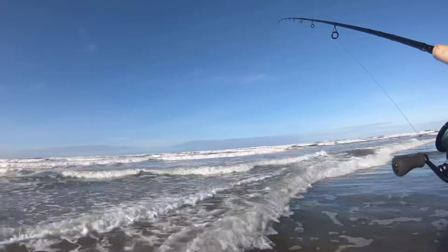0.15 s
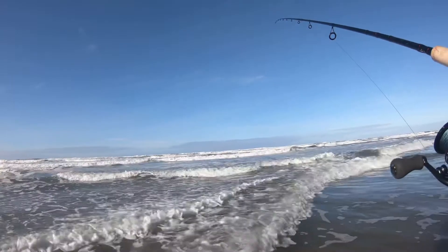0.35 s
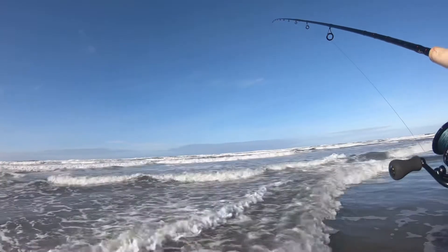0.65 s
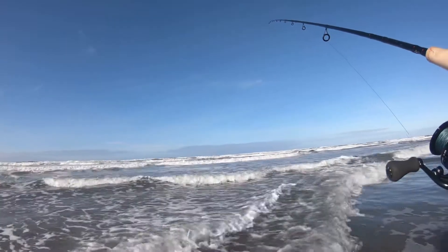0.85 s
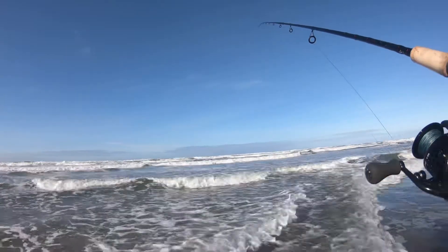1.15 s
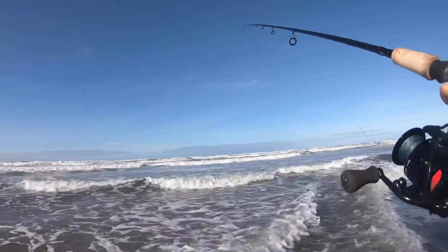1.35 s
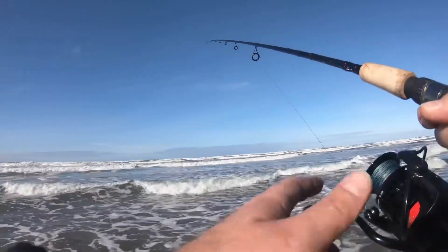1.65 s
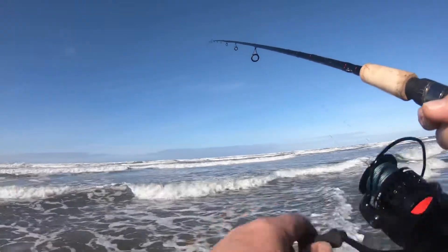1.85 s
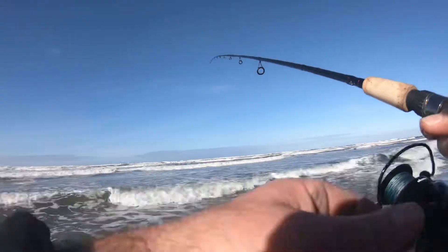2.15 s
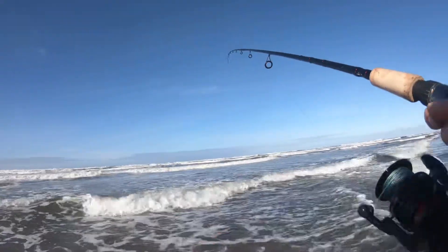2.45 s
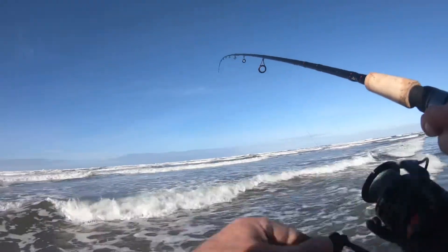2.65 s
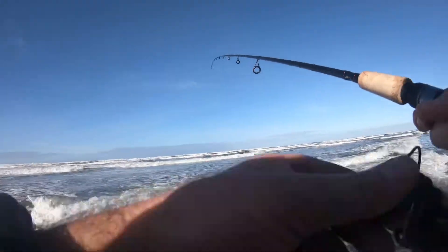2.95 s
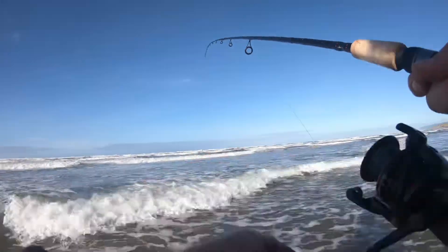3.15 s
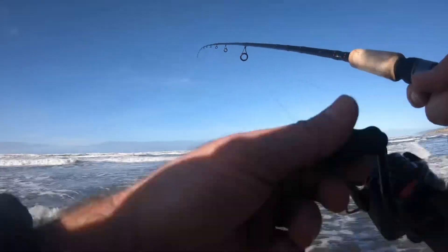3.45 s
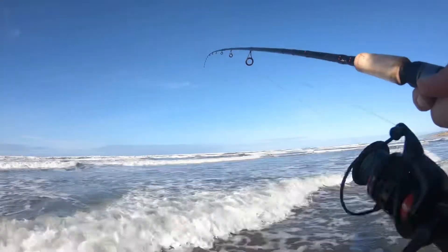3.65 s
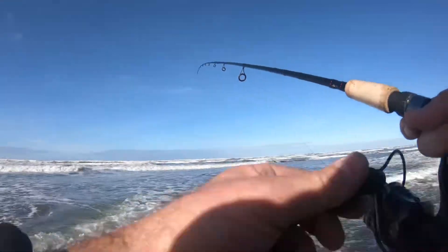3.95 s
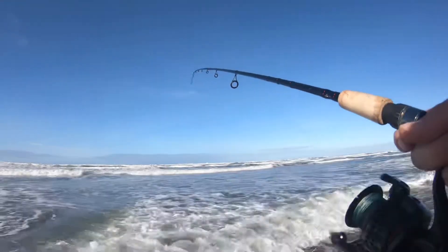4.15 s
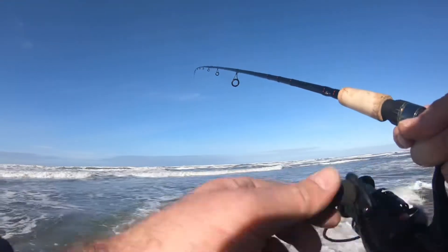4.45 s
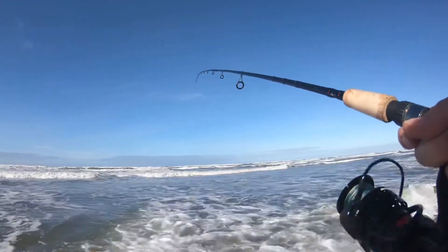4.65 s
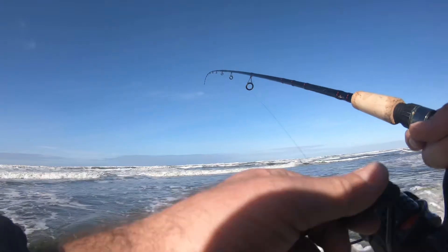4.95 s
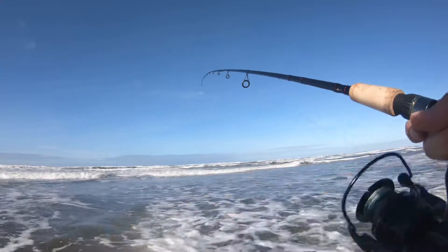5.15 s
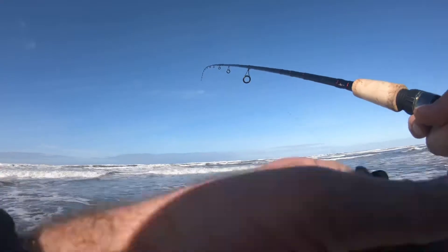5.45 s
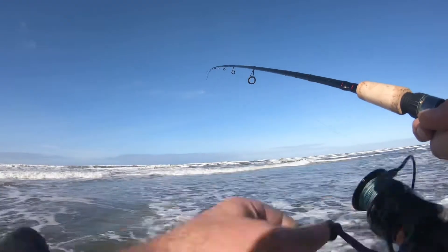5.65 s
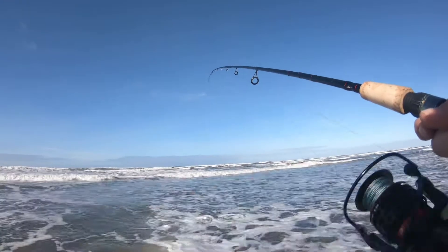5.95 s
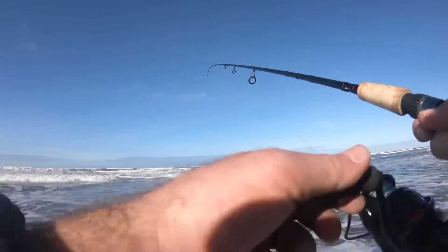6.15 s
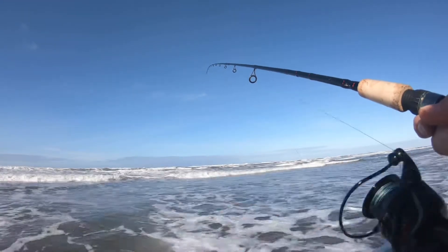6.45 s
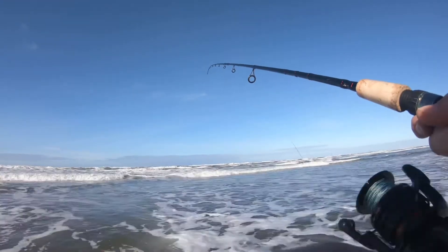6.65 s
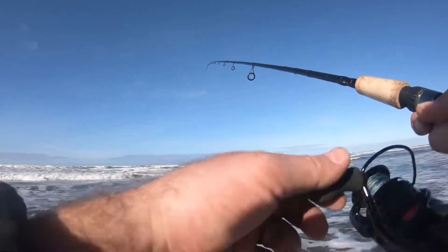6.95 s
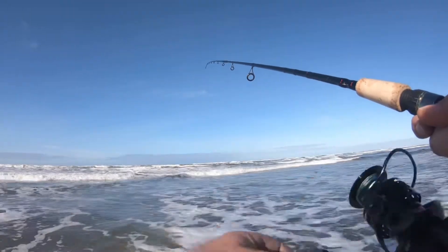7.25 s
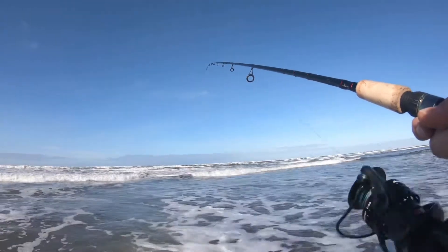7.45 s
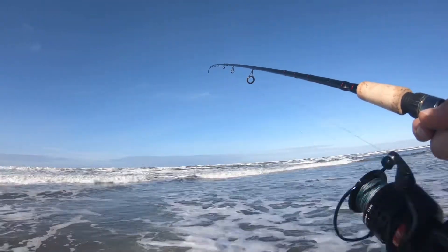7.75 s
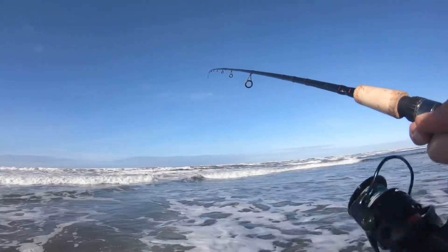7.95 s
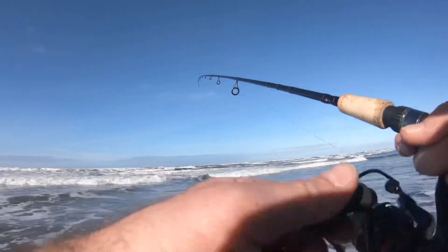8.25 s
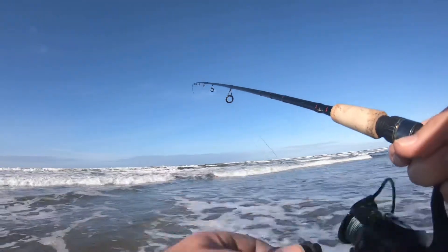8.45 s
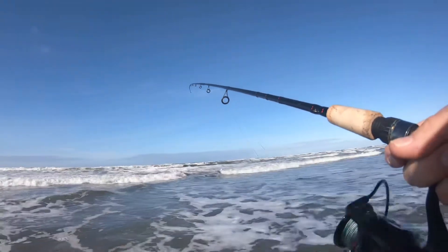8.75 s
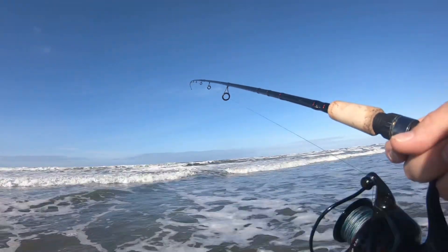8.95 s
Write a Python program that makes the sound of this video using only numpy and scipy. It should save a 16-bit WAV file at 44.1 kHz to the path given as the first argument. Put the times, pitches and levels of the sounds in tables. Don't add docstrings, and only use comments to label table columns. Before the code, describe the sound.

From the start, a close patchy wash with crisp bubbling foam sits over a steady, muffled roar of distant breakers. The near water slowly eases until about 2.7 seconds. Very soft deep heartbeat thumps recur roughly every 0.6 seconds, with dull rumbles of strap and body movement. Around 1.4 to 1.8 seconds come light knocks, tiny ticks and short reel rattles. At 3.4 a single very loud, hard hollow knock cracks out and stops almost at once. A cluster of knocks and quick rattles follows at 3.9 to 4.1, more rattling near 4.35, and another knocking group at 4.8 to 5.0. The wash surges around 4.4 to 4.6, with small leg slaps, then falls away by 6. Faint ticks end by 5.6. Afterwards far surf dominates with thin fizz, and near wash returns slightly around 8.7 before the end at 9.1. Sound is close, boxy, outdoors, without echo.

```python
import sys
import numpy as np
from scipy import signal
from scipy.fft import rfft, irfft, next_fast_len
from scipy.io import wavfile
from scipy.ndimage import uniform_filter1d, map_coordinates

SR = 44100
rng = np.random.default_rng(int(sys.argv[2]) if len(sys.argv) > 2 else 0)


def attenuation_scalar(level_db):
    decades = np.asarray(level_db, float) / 20
    return 10 ** decades


def log_audio(samples):
    frames = np.atleast_2d(samples).T
    limited = np.clip(frames, -1, 1)
    pcm = np.round(limited * 32767).astype(np.int16)
    wavfile.write(sys.argv[1], SR, pcm)


N = 401751

# time in seconds, level in dB.
FAR_ROAR = [
    (0, -39.5),
    (.55, -39.5),
    (1.44, -37),
    (2.5, -38),
    (4.9, -36),
    (5.7, -38.5),
    (9.11, -38.5),
]
# frequency in Hz, left port in dB, right port in dB.
ROAR_COLOUR = [(91, -9.5, -3), (174, 0, -0.5), (301, -2.5, -1.5), (568, -6, -9), (786, -3.5, -0.5),
               (950, -8, -4), (1095, -8, -16), (1605, -4, 1.5), (1813, -13.5, -8.5), (1990, -11, 0),
               (2575, -15, -8), (2830, -45, -29), (3070, -30, -25), (3550, -18, -16)]
# frequency in Hz, left port in dB, right port in dB.
WASH_COLOUR = [(172, -12.5, -11.5), (333, -13.5, -15.5), (436, -33, -19), (562, -8, -16), (843, -11, -5),
               (1220, -6, -6), (1610, -4.5, 4), (1865, -6, -10.5), (2025, -6.5, 3), (2780, -15.5, -7),
               (2840, -35, -13), (3200, -21, -18.5), (3030, -38, -15), (3550, -18, -15.5)]
# frequency in Hz, left port in dB, right port in dB.
FIZZ_COLOUR = [(2666, 1.5, 20.5), (3148, 8, 4.5), (3220, -2, -2.5), (4180, -22.5, -5), (4670, -6, -4),
               (6360, -20.5, -10), (6020, -11.5, -13.5), (8440, -23, -15), (8470, -12.5, -12),
               (8900, -19, -20.5), (11020, -26.5, -26.5), (11430, -33, -30), (12400, -34, -33),
               (14168, -41, -39)]
# frequency in Hz, likeness from 0 to 1.
PORT_LIKENESS = [(400, 1), (600, 0.95), (950, 0.97), (1120, 0.71), (1350, 0.74), (2150, 1), (2300, 0.28),
                 (2700, 1), (2900, 1), (3500, 0.7), (4100, 0), (4900, 0.98), (7000, 0.13), (10500, 0.23)]
# frequency in Hz, lead in radians.
PORT_LEAD = [(300, 0.045), (520, 0.23), (800, 2.52), (1076, 3.66), (1200, 5.4), (2200, 6.37), (2350, 5.35),
             (2850, 7.2), (3100, 3.7), (3500, 5.03), (4150, 6.6), (4400, 3.92), (6500, 3.1), (9000, 5.9)]
# time in seconds, wash in dB, bursting foam against the wash in dB.
NEAR_WAVE = [(0, -22.5, -22.5), (.94, -25.5, -21), (1.5, -27, -19.5), (2.28, -30, -20), (2.7, -30.5, -19.5),
             (3.25, -25.5, -23), (3.45, -27.5, -21.5), (3.73, -25, -22.5), (4.28, -22.5, -22.5),
             (4.42, -20.5, -18.5), (4.6, -20.5, -19.5), (5.04, -24.5, -19.5), (5.5, -31.5, -19),
             (6.06, -40, -16), (6.9, -40.5, -17.5), (7.84, -38, -18), (8.7, -32, -23), (9.11, -33.5, -19)]
# time in seconds, lift in dB.
LEG_SLAPS = [(1.27, 0.5), (2.38, 2.5), (2.79, 2), (3.25, -1), (3.73, 1.5), (3.93, 1), (4.05, 2),
             (4.36, 0.5), (5.02, 3.5), (7.84, -0.5), (8.7, 2)]
# start in seconds, first sound in dB, second sound in dB.
HEARTBEATS = [(-.04, -33, -47), (.548, -30, -37), (1.109, -26, -40), (1.67, -47, -49), (2.3, -29, -38),
              (2.846, -26, -45), (3.459, -35, -52), (4.009, -31, -45), (4.545, -36, -47), (5.122, -39, -32),
              (5.71, -32.5, -40), (6.265, -32, -44), (6.853, -31, -38), (7.44, -37, -48), (8.02, -32, -41),
              (8.589, -41, -46)]
# start in seconds, level in dB.
CHEST_BUMPS = [(2.053, -43), (3.239, -39), (3.919, -28)]
# time in seconds, level in dB, half length in seconds.
MOVEMENTS = [(.57, -35.5, .045), (.98, -50, .04), (1.15, -42, 0.091), (1.42, -42.5, 0.087),
             (1.678, -36, 0.073), (2.05, -49, .06), (2.23, -46, 0.046), (2.437, -47.5, .04),
             (2.85, -54, 0.33), (3.7, -50, .03), (3.93, -36, 0.056), (4.37, -53, .04), (4.597, -37, .045),
             (4.9, -50, 0.055), (5.15, -42, 0.071), (5.36, -52, .05), (5.74, -47, .04), (5.9, -53, .08),
             (6.302, -47, 0.067), (6.9, -50, .05), (7.45, -56, .05), (7.64, -68, .04), (8.053, -43, .04),
             (8.27, -58, .04), (8.64, -44, 0.043), (8.84, -60, .04)]
# start in seconds, thud in dB, ring in dB, clink in dB.
MOUNT_KNOCKS = [(1.358, -26, -34, -18), (1.682, -23.5, -42, -40), (3.4053, -42, -10, -11),
                (3.4076, -4.5, -2.5, -3), (3.89, -21.5, -30, -35), (3.922, -21, -21, -9),
                (3.955, -39, -39, -35), (3.98, -20, -37, -22), (4.811, -27, -27, -33),
                (4.861, -22, -33, -35), (4.9822, -17, -14, -15)]
# frequency in Hz, level in dB, time to fade by 60 dB in seconds.
THUD_TONES = [(143, 1, 0.061), (191, 2, 0.046), (239, -4, 0.089)]
# frequency in Hz, level in dB, time to fade by 60 dB in seconds.
RING_TONES = [(604, -3, 0.036), (854, 1, 0.041), (965, -2, .018)]
# frequency in Hz, level in dB, time to fade by 60 dB in seconds.
CLINK_TONES = [(1146, 5, 0.017), (1600, -8, .015), (3500, -23, .008), (4720, -10, .009), (6000, -22, .006)]
# start in seconds, peak in dB, frequency in Hz.
REEL_TICKS = [
    (1.3877, -42, 6700),
    (1.4681, -37, 8550),
    (1.5938, -40, 6170),
    (4.9994, -34, 6150),
    (5.0294, -41, 6550),
    (5.4694, -44, 6720),
    (5.6096, -43, 6220),
]
# start in seconds, level in dB.
REEL_RATTLES = [(1.357, -21), (1.541, -17), (1.819, -20), (3.9235, -12), (3.98, -12), (4.023, -13),
                (4.054, -15), (4.085, -12), (4.34, -15), (4.381, -11), (4.912, -15), (4.978, -17)]
# frequency in Hz, level in dB, time to fade by 60 dB in seconds.
RATTLE_TONES = [(1555, -2.5, .03), (2030, -0.5, .02)]

CROSS_HZ = 3300
FIRST_HZ, SECOND_HZ, SECOND_AFTER_S = 28.5, 33.3, 0.223


def unit(x):
    return x / np.sqrt(np.mean(x ** 2) + 1e-20)


def along(points, hz):
    f, *columns = np.transpose(points)
    return np.array([np.interp(np.log(hz + 1), np.log(f + 1), column) for column in columns])


def curves(rows):
    s, *columns = np.transpose(rows)
    return [np.interp(np.arange(N) / SR, s, column) for column in columns]


def wobble(rate):
    knots = rng.standard_normal(int(N * rate / SR) + 4)
    return map_coordinates(knots, [np.arange(N) * rate / SR])


def swells(rows):
    out = np.zeros(N)
    for s, height, half in rows:
        first = max(round((s - 4 * half) * SR), 0)
        last = min(round((s + 4 * half) * SR), N)
        near = np.arange(first, last)
        out[near] += height * np.exp(-((near / SR - s) / half) ** 2)
    return out


def filtered(x, response):
    m = next_fast_len(N + SR // 2)
    return irfft(rfft(x, m) * response(np.fft.rfftfreq(m, 1 / SR)), m)[..., :N]


def above(hz, edge_hz, order):
    return 1 / np.sqrt(1 + (edge_hz / (hz + 1)) ** (2 * order))


def body(hz):
    return above(hz, edge_hz=144.4, order=5) * np.sqrt(1 - above(hz, CROSS_HZ, order=12) ** 2)


def top(hz):
    return above(hz, CROSS_HZ, order=12)


def phase_turn(hz):
    return np.array([[-.5], [.5]]) * along(PORT_LEAD, hz)


def at_ports(pair, colour, edges):
    def shares(hz):
        angle = np.arccos(np.clip(along(PORT_LIKENESS, hz)[0], 0, 1)) / 2
        return np.array([np.cos(angle), np.sin(angle)])

    common, different = filtered(pair, shares)
    ports = np.array([common + different, common - different])
    coloured = filtered(ports, lambda hz: attenuation_scalar(along(colour, hz)) * edges(hz))
    turned = filtered(coloured, lambda hz: np.exp(1j * phase_turn(hz)))
    return turned / np.std(turned.mean(axis=0))


def water(pops, pop_db, patchy_db):
    burst = (rng.random((2, N)) < pops / SR) * attenuation_scalar(pop_db)
    spectrum = signal.stft(rng.standard_normal((2, N)) * (1 + burst), nperseg=512)[2]
    patches = uniform_filter1d(rng.standard_normal(spectrum.shape[1:]), size=7, axis=0)
    patches = uniform_filter1d(patches, size=12, axis=1)
    return signal.istft(spectrum * attenuation_scalar(patchy_db * unit(patches)), nperseg=512)[1][:, :N]


def far_roar():
    level_db, = curves(FAR_ROAR)
    noise = at_ports(water(pops=120, pop_db=8.0, patchy_db=0.18), ROAR_COLOUR, body)
    return attenuation_scalar(level_db + 6 + 0.12 * wobble(5.6)) * noise


def movement_rumble():
    band = lambda hz: above(hz, edge_hz=48, order=3) * (1 - above(hz, edge_hz=125, order=3))
    rumble = unit(attenuation_scalar(5.0 * wobble(15)) * filtered(rng.standard_normal(N), band))
    still = attenuation_scalar(-56.5)
    return (still + swells([(s, attenuation_scalar(db), half) for s, db, half in MOVEMENTS])) * rumble


def heartbeat():
    t, out = np.arange(N) / SR, np.zeros(N)
    pushes = [(s, db, FIRST_HZ) for s, db, _ in HEARTBEATS]
    pushes += [(s + SECOND_AFTER_S, db, SECOND_HZ) for s, _, db in HEARTBEATS]
    pushes += [(s, db, FIRST_HZ) for s, db in CHEST_BUMPS]
    for s, db, hz in pushes:
        near = slice(max(round((s - .1) * SR), 0), round((s + .2) * SR))
        u = t[near] - s - .027
        out[near] -= attenuation_scalar(db) * np.exp(-(u * hz / 0.98) ** 2) * np.cos(2 * np.pi * hz * u)
    return out


def ringing(tones, t, attack):
    total = 0
    for hz, db, t60 in tones:
        total = total + attenuation_scalar(db - 60 * t / t60) * np.sin(2 * np.pi * hz * t + phase_turn(hz))
    return total * (1 - np.exp(-t / attack))


def tick(t, db, hz):
    puff = .45 * attenuation_scalar(-60 * t / .03) * rng.standard_normal((2, len(t)))
    return attenuation_scalar(db + 8.5) * (ringing([(hz, 0, .02)], t, attack=.0005) + puff)


def rattle(t, db):
    return attenuation_scalar(db + np.array([[-3], [3]])) * ringing(RATTLE_TONES, t, attack=0.00068)


def knock(t, thud_db, ring_db, clink_db):
    grip = .2 + .8 / (1 + (t / .0115) ** 6)
    push = ringing(THUD_TONES, np.maximum(t - .0011, 0), attack=0.0022)
    crack = 0.038 * attenuation_scalar(-60 * ((t - .0011) / .0016) ** 2) * rng.standard_normal((2, len(t)))
    ring = attenuation_scalar(ring_db) * ringing(RING_TONES, t, attack=.001)
    clink = attenuation_scalar(clink_db) * (ringing(CLINK_TONES, t, attack=.001) + crack)
    return grip * (ring + clink - attenuation_scalar(thud_db) * push)


def gear():
    t, out = np.arange(SR // 8) / SR, np.zeros((2, N + SR))
    hits = [(knock, row) for row in MOUNT_KNOCKS]
    hits += [(tick, row) for row in REEL_TICKS]
    hits += [(rattle, row) for row in REEL_RATTLES]
    for sound, (s, *settings) in hits:
        first = round(s * SR)
        out[:, first:first + len(t)] += sound(t, *settings)
    return filtered(out[:, :N], lambda hz: 1j * hz / (75 + 1j * hz) / (1 + 1j * hz / 11000) ** 3)


def near_wave():
    wash_db, foam_db = curves(NEAR_WAVE)
    fizz_db = wash_db + foam_db
    slap_db = swells([(s, db, 0.03) for s, db in LEG_SLAPS])
    slosh = wobble(7)

    wash = at_ports(water(pops=200, pop_db=9, patchy_db=1.5), WASH_COLOUR, body)
    wash = attenuation_scalar(wash_db + slap_db - 2.5 + 0.57 * slosh) * wash

    foam = at_ports(water(pops=300, pop_db=14.5, patchy_db=0.7), FIZZ_COLOUR, top)
    spray = filtered(foam, lambda hz: above(hz, edge_hz=8800, order=3))
    spray_db = -.5 + 0.22 * (fizz_db - fizz_db.mean()) + 0.91 * wobble(12)
    fizz_level = attenuation_scalar(fizz_db + 0.69 * slap_db + 2.5 + 0.74 * slosh + 0.45 * wobble(18))
    return wash + fizz_level * (foam + (attenuation_scalar(spray_db) - 1) * spray)


def scene():
    chest = attenuation_scalar([[-.4], [.4]]) * (movement_rumble() + heartbeat())
    return far_roar() + chest + gear() + near_wave()


def top_cut(x):
    return signal.sosfilt(signal.butter(12, 14250, fs=SR, output="sos"), x)


def record(dry):
    rounded = dry / (1 + np.abs(dry / 1.03) ** 8) ** (1 / 8)
    return top_cut(rounded)


dry = scene()
out = record(dry)
log_audio(out)
```